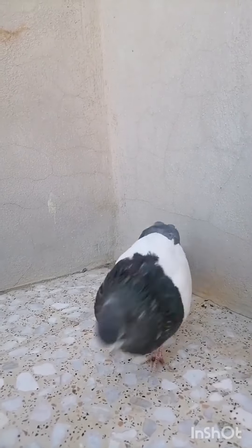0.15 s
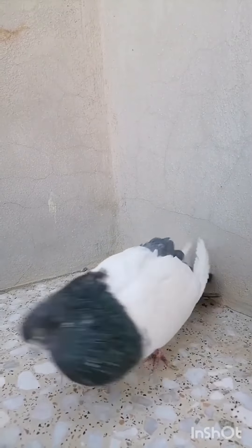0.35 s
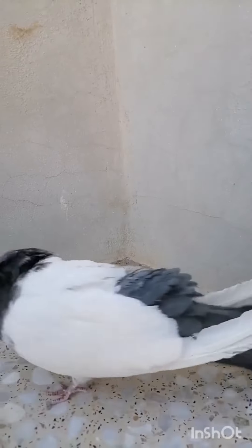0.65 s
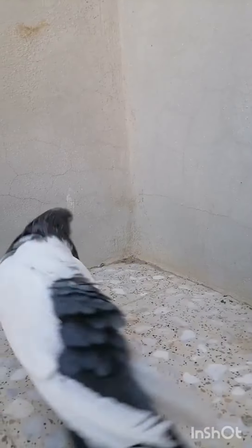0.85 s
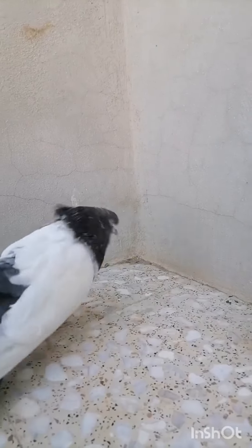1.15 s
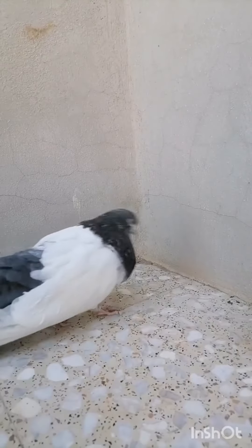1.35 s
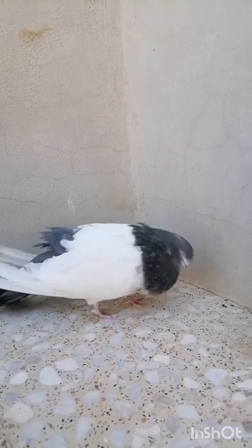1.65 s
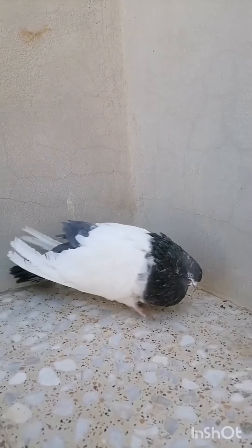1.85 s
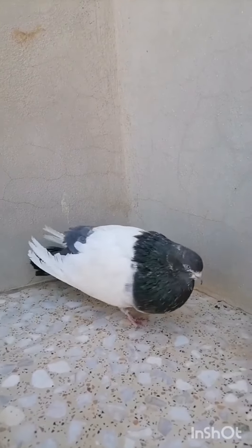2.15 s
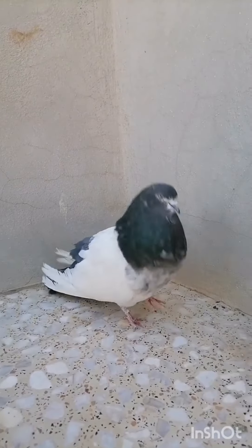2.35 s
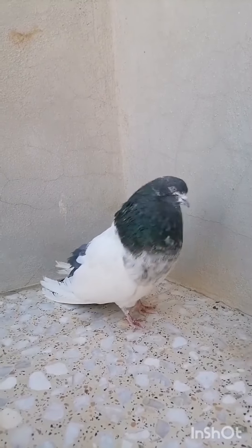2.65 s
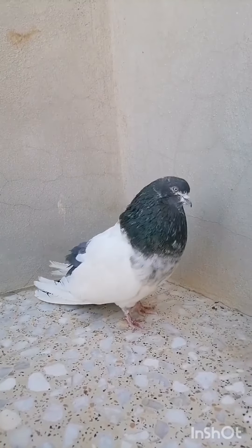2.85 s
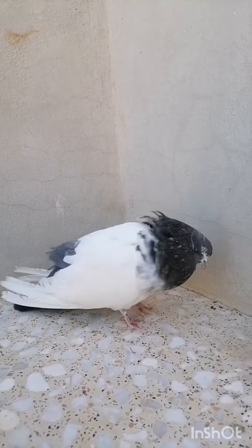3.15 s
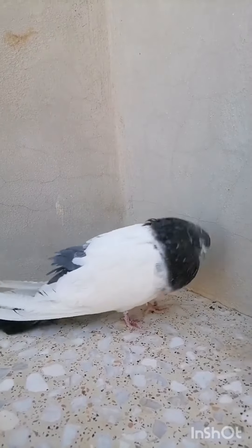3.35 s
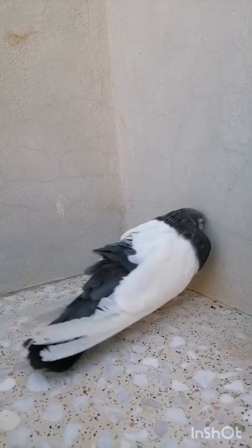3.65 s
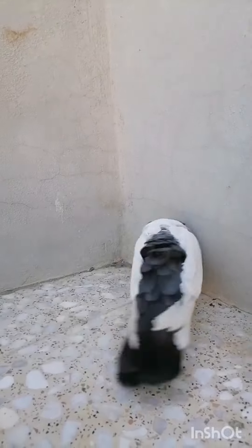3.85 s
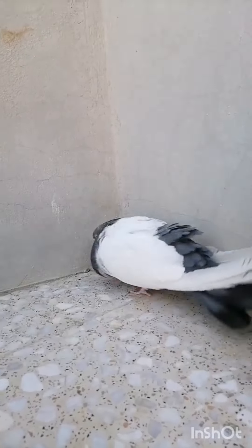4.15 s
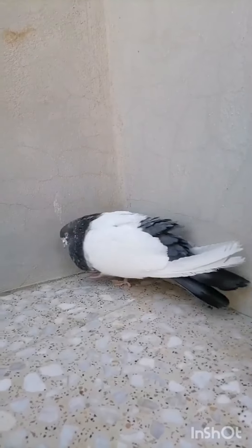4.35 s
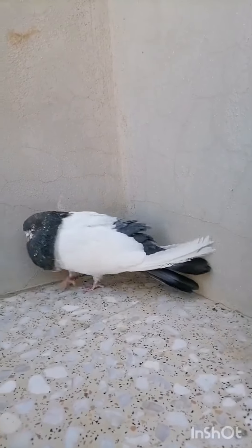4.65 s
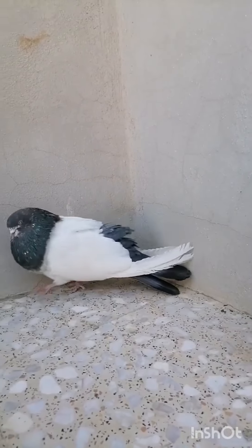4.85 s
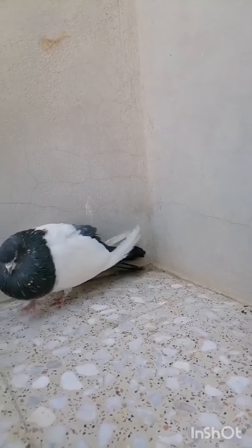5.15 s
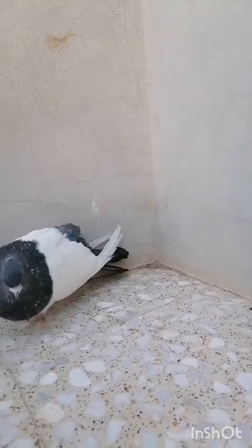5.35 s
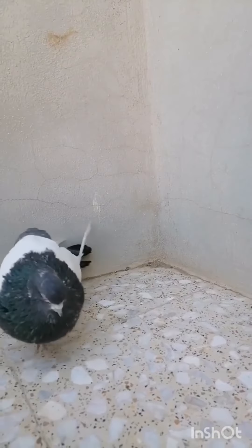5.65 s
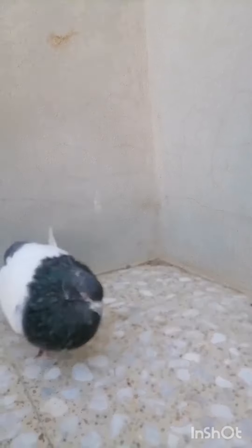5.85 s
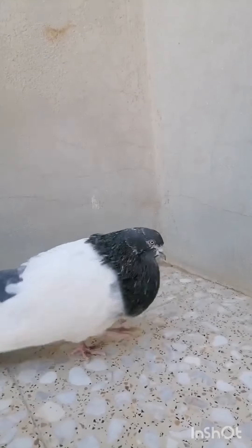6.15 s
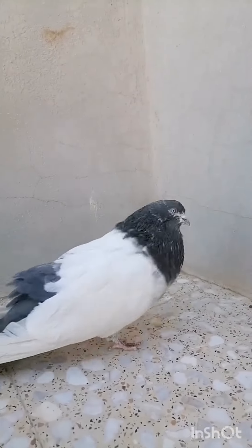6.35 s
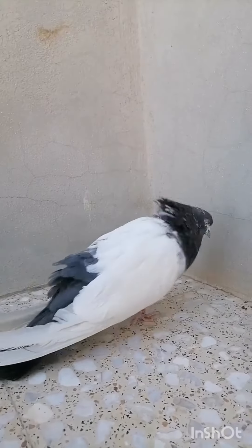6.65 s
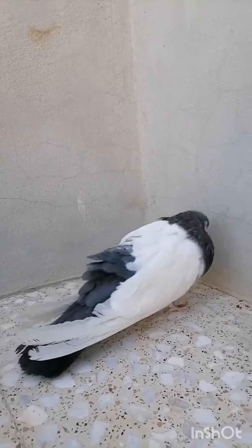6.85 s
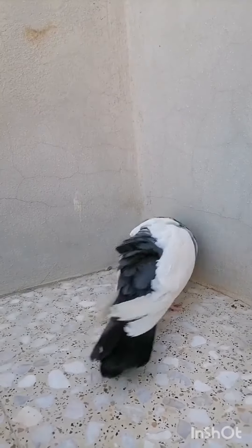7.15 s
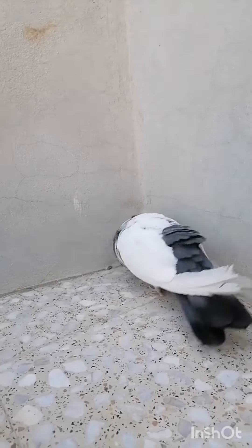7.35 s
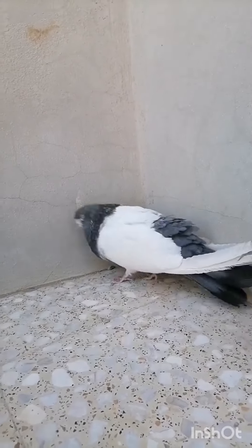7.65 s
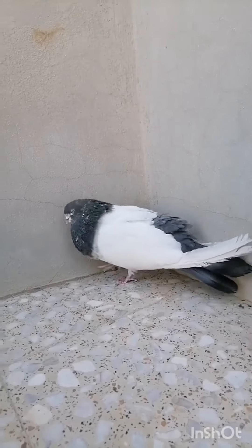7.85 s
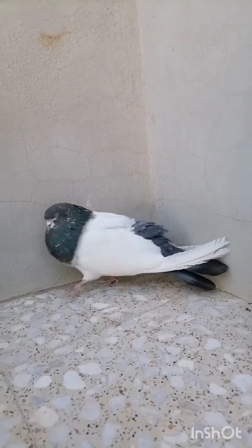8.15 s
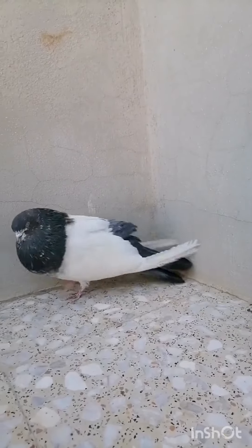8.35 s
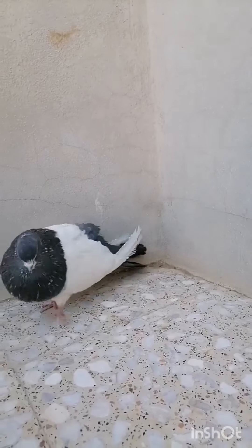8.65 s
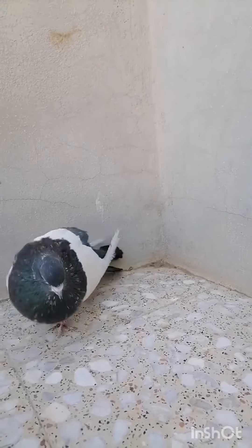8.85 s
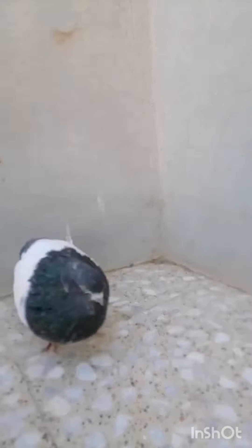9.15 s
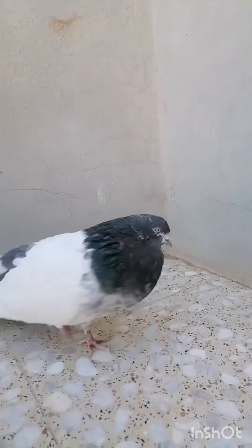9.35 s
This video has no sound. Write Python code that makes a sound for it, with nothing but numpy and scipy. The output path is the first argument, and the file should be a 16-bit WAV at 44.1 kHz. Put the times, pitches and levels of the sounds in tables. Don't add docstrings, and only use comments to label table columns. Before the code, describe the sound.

Low pigeon coos, clapping wingbeats and a perch landing, then quiet claw taps and distant birdsong before a closer, doubled gargling coo stops abruptly.

```python
import sys
import numpy as np
from scipy import signal
from scipy.fft import rfft, irfft
from scipy.io import wavfile
from scipy.ndimage import uniform_filter1d, minimum_filter1d

SR = 44100
rng = np.random.default_rng(int(sys.argv[2]) if len(sys.argv) > 2 else 0)


def level_to_linear(level):
    exponent = np.asarray(level, float) / 20
    return 10 ** exponent


def generate_wav(signal):
    frames = np.transpose(np.atleast_2d(signal))
    scaled = np.clip(frames, -1, 1) * 32767
    pcm = np.round(scaled).astype(np.int16)
    wavfile.write(sys.argv[1], SR, pcm)


N = 418950
FLIGHT_S, SPLICE_S, END_S = 1.54, 6.52, 8.467


def index(s):
    return int(np.clip(s * SR, 0, N - 1))


def butter(x, hz, kind, order=2):
    return signal.sosfilt(signal.butter(order, np.clip(hz, 10, .45 * SR), kind, fs=SR, output="sos"), x)


def both_ways(x, hz, kind):
    return signal.sosfiltfilt(signal.butter(3, hz, kind, fs=SR, output="sos"), x, padlen=600)


def rms_one(x):
    return x / np.sqrt(np.mean(x ** 2) + 1e-20)


def wobble(size, hz):
    z = rng.standard_normal((2, 30000))
    z = rms_one(butter(z, hz, "low", order=4)[:, 3000:3000 + size])
    return z[0] + 1j * z[1]


def span(rows, fade=0.0054):
    s, *columns = np.transpose(rows)
    t = np.arange(index(s[0]), index(s[-1])) / SR
    gate = np.clip(np.minimum(t - s[0] + (s[0] == 0), s[-1] - t) / fade, 0, 1)
    return slice(index(s[0]), index(s[-1])), gate, [np.interp(t, s, c) for c in columns]


def coloured(spectrum, patchy_db):
    hz = np.fft.rfftfreq(N, 1 / SR) + 1
    edges = 20 * 2 ** np.arange(0, 10.5, .5)
    at, db = np.transpose(spectrum)
    shaped = rfft(rng.standard_normal(N)) * level_to_linear(np.interp(np.log(hz), np.log(at), db))
    out = 0
    for low, high in zip(edges, edges[1:]):
        points = np.arange(N // 1500 + 2)
        flicker = np.interp(np.arange(N) / 1500, points, rng.standard_normal(len(points)))
        out = out + irfft(shaped * ((hz >= low) & (hz < high)), N) * level_to_linear(patchy_db * flicker)
    return out / np.std(butter(out, 1500, "high", order=4))


def bursts(events, width, gain_db, order=1):
    out, t = np.zeros(N + 9000), np.arange(9000) / SR
    for (s, db, hz, t60), noise in zip(events, rng.standard_normal((len(events), len(t)))):
        band = rms_one(butter(noise, [hz / width, hz * width], "band", order=order))
        rise = np.minimum(t / (0.025 * t60), 1)
        out[index(s):index(s) + len(t)] += level_to_linear(db + gain_db - 60 * t / t60) * rise * band
    return out[:N]


def crop_puffs(puffs):
    out, t = np.zeros(N), np.arange(4000) / SR
    turns = rng.uniform(0, 2 * np.pi, (len(puffs), 2))
    for (s, db, hz, upper_hz, upper_db, length), turn in zip(puffs, turns):
        u = t / (0.42 * length)
        tone = np.sin(2 * np.pi * hz * t + turn[0])
        tone += level_to_linear(upper_db) * np.sin(2 * np.pi * upper_hz * t + turn[1])
        start = index(s - .002)
        out[start:start + len(t)] += level_to_linear(db) * u ** 1.5 * np.exp(1.07 * (1 - u ** 2)) * tone
    return out


# time in seconds, pitch in Hz, effort in dB,
# throat stretch in dB (lifts the third harmonic).
COOS = [
    [(1.32, 92.2, -32, -7), (1.4, 133.7, -33, 5), (1.47, 172, -36, -14), (1.545, 197, -34, -27.5)],
    [(0, 180, -8, -20), (.07, 174.4, -4.5, -30), (.11, 177.2, -4, -26), (.14, 182.2, -5.5, -35),
     (.2, 187.6, -7.5, -40), (.225, 184, -10.5, -35.5), (.3, 172.7, -10.5, -32), (.35, 176.2, -17.5, -20.5),
     (.41, 170.3, -38, -19.5)],
    [(2.16, 129.3, -28, 0.5), (2.2, 126.2, -19, 4.5), (2.26, 121.6, -24.5, 7.5), (2.321, 129.2, -15, -5.5),
     (2.38, 134.5, -18, -1), (2.435, 125.3, -18.5, 0.5), (2.45, 129.2, -39, 11.5), (2.53, 137.4, -45, 8)],
]
CLOSE_COOS = [
    [(7.0, 147.1, -37, 12), (7.06, 172.9, -33.5, -12), (7.087, 208, -19.5, -10),
     (7.12, 196.6, -19.5, -10.5), (7.238, 184.5, -19, -6.5), (7.248, 183.7, -65, -3),
     (7.33, 189.2, -44.5, 10), (7.5, 188.2, -48, -3)],
    [(7.93, 147.7, -46, 11), (8.0, 179.2, -36, -1.5), (8.042, 209.6, -26, -21.5), (8.065, 195.3, -20, -1.5),
     (8.099, 177.8, -22.5, -3.5), (8.184, 177.8, -21.5, 0), (8.199, 175, -47, 6), (8.28, 170.3, -40.5, 4),
     (8.38, 168, -67, 3)],
]
# roughness [0-1], strong-weak alternation [0-1], flutter depth [0-1],
# flutter rate in Hz, fundamental in dB relative to the second harmonic.
COO_GRAIN = [
    (0.3, 0.2, 0.05, 29, 2),
    (0.17, 0.08, 0.15, 27, -15),
    (0.55, 0.22, 0, 39, -25),
    (0.25, 0.3, 0.22, 43, -14),
    (0.22, 0.27, 0.16, 50, -13),
]
# low edge in Hz, high edge in Hz.
CROP_BANDS = [(149, 1500), (155, 1500), (225, 1500), (162, 680), (160, 720)]
# time in seconds, depth [0-1].
CATCHES = [(0.026, 0.4), (0.062, 0.9), (.086, 0.94), (0.11, 1), (0.153, 0.47), (0.169, 0.4), (0.214, 0.4),
           (0.232, 0.3), (0.252, 0.54), (0.27, 0.8), (0.307, 1), (.321, 1), (.347, 0.9), (.369, 0.6)]


def coos():
    out = np.zeros(N)
    rattles_db = [-26.5, -12, -29, -19.5, -24]
    for rows, grain, rattle_db, (low_hz, high_hz) in zip(COOS + CLOSE_COOS, COO_GRAIN, rattles_db, CROP_BANDS):
        rough, weak, depth, flutter_hz, first_db = grain
        at, gate, (pitch, db, third_db) = span(rows)
        beat = np.cumsum(flutter_hz * (1 + 0.23 * wobble(len(gate), 15).real)) / SR
        flutter = depth * np.cos(2 * np.pi * beat)
        pitch = pitch * (1 + 0.21 * flutter)
        phase = 2 * np.pi * np.cumsum(pitch) / SR
        shape = gate * (1 + weak * np.cos(phase / 2)) * (1 + flutter)
        top_db = min(third_db.mean(), -12)
        levels = [first_db, 0, third_db, top_db - 8, top_db - 15, top_db - 22]
        for k, rel_db in enumerate(levels):
            waver = np.sqrt(1 - rough) + np.sqrt(rough / 2) * wobble(len(gate), 51.5)
            waver = waver / (np.abs(waver) + 0.13) ** 0.5
            tone = np.sqrt(2) * shape * level_to_linear(db + rel_db) * np.real(waver * np.exp(1j * (k + 1) * phase))
            if k < 2:
                tone = both_ways(tone, 2.78 * pitch.max(), "low")
            out[at] += tone
        rattle = np.real(wobble(len(gate), 50) * np.exp(1j * 1.4 * phase))
        out[at] += gate * level_to_linear(db + rattle_db) * rattle
        out[at] = both_ways(both_ways(out[at], low_hz, "high"), high_hz, "low")
    t = np.arange(SR // 2) / SR
    for s, depth in CATCHES:
        out[:len(t)] *= 1 - depth * np.exp(-((t - s) / 0.0057) ** 2)
    return out


# start in seconds, peak in dB, pitch in Hz, length in seconds.
THROBS = [(1.234, -36.5, 301, 0.038), (1.329, -21, 555, 0.0076), (1.553, -13, 325, 0.025),
          (1.566, -15, 387, 0.017), (1.572, -19, 270, 0.0085), (1.59, -25, 370, 0.012),
          (1.614, -16.5, 540, 0.012), (1.617, -34, 535, 0.036), (1.716, -11, 355, 0.028),
          (1.784, -9.5, 370, 0.028), (1.871, -3.5, 364, 0.014), (1.881, 0.5, 333, 0.014),
          (1.961, 2.5, 351, 0.036), (1.988, -8, 353, 0.018), (2.028, -27, 340, 0.061)]


def throbs():
    return crop_puffs([(s, db, hz, 500, -20, length) for s, db, hz, length in THROBS])


# start in seconds, peak in dB, lower and upper resonance in Hz.
GARGLE = [(6.572, -25, 392, 467), (6.587, -27, 334, 434), (6.617, -30, 390, 580), (6.716, -25.5, 302, 433),
          (6.755, -23, 285, 487), (6.802, -18.5, 297, 528), (6.871, -14, 328, 568), (6.988, -13, 320, 534),
          (7.231, -16.5, 374, 531), (7.295, -20, 393, 690), (7.305, -30, 645, 760), (7.529, -21, 420, 470),
          (7.543, -24, 332, 500), (7.576, -20, 380, 648), (7.604, -23.5, 403, 686), (7.674, -23, 413, 490),
          (7.709, -20, 263, 515), (7.751, -16, 306, 532), (7.811, -13.5, 311, 566), (7.897, -11, 317, 572),
          (8.184, -21, 347, 558)]


def gargle():
    puffs = []
    for s, db, hz, upper_hz in GARGLE:
        length = 0.013 * level_to_linear(0.59 * (db + 19.5))
        puffs.append((s, db, hz, upper_hz, 0.9, length))
    return crop_puffs(puffs)


# time in seconds, pitch in Hz, level in dB.
GLIDES = [
    [(1.66, 181, -45.5), (1.68, 183.3, -29), (1.79, 207.5, -37)],
    [(1.795, 304, -7.5), (1.86, 476, -25.5), (1.92, 570, -30.5), (1.96, 573, -27.5)],
    [(1.99, 487.4, -26), (2.05, 485.5, -29), (2.1, 418, -19), (2.14, 356, -12.5), (2.185, 245, -24)],
    [(6.89, 249, -44), (6.93, 276.7, -39.5), (6.96, 289, -35), (6.985, 305, -51)],
]
GLIDE_OCTAVES = [2, -33.5, -42, 6.5]


def glides():
    out = np.zeros(N)
    for rows, octave_db in zip(GLIDES, GLIDE_OCTAVES):
        at, gate, (pitch, db) = span(rows)
        phase = 2 * np.pi * np.cumsum(pitch) / SR
        uneven = 1 + 0.25 * wobble(len(gate), 39.8).real
        tone = level_to_linear(db) * np.sin(phase) + level_to_linear(db + octave_db) * np.sin(2 * phase)
        out[at] += np.sqrt(2) * gate * uneven * tone
    return out


# start in seconds, peak in dB.
CREAKS = [(6.638, -44), (7.108, -18), (7.365, -27), (7.436, -29), (7.447, -27), (7.458, -39),
          (7.584, -23.5), (7.595, -28.5), (8.264, -25), (8.275, -28), (8.288, -22), (8.297, -22),
          (8.305, -14), (8.317, -31), (8.328, -21), (8.347, -38), (8.386, -43), (8.4, -33), (8.418, -46),
          (8.443, -35.5)]


def creaks():
    out, t = np.zeros(N), np.arange(2000) / SR
    throat = [(370, 0.014, 0.5), (663, 0.017, 1.5), (930, 0.0088, -23)]   # Hz, t60 s, dB
    for (s, db), spread in zip(CREAKS, rng.standard_normal((len(CREAKS), 3))):
        for (hz, t60, rel_db), z in zip(throat, spread):
            ring = np.sin(2 * np.pi * hz * (1 + 0.048 * z) * t)
            out[index(s):index(s) + len(t)] += level_to_linear(db + rel_db + .5 * z - 60 * t / t60) * ring
    return butter(out, [260, 1150], "band")


# start in seconds, peak in
# dB, centre in Hz, t60 in seconds.
NOISE_BURSTS = [(.018, -24.5, 2300, 0.027), (.049, -23, 1872, 0.021), (.214, -34.5, 3200, 0.018),
                (.503, -34.5, 1880, .03), (1.55, -29, 2180, 0.046), (1.72, -27, 30, .4),
                (1.748, -17, 5200, .03), (1.556, -31, 11000, .02), (6.398, -35, 3180, .06),
                (1.873, -23, 7000, 0.026), (7.231, -29.5, 593, 0.023), (7.604, -31.5, 693, 0.023),
                (8.185, -27, 596, 0.025), (0, -30, 900, 0.085), (.98, -33, 200, 0.22),
                (3.563, -39.5, 2200, .12), (4.25, -44, 544, 0.28), (1.7, -30, 35, 0.68), (6.53, -45.5, 189, .3),
                (7.108, -33, 1120, 0.045), (7.26, -42, 690, 0.1), (7.292, -34, 800, 0.024),
                (7.39, -33, 1171, 0.049), (7.432, -27.5, 1330, 0.038), (8.058, -33.5, 935, 0.036),
                (8.24, -35.5, 665, 0.14), (2.833, -28, 2420, 0.11)]


def noise_bursts():
    return bursts(NOISE_BURSTS, width=1.5, gain_db=-2.0)


# time in seconds, hiss in dB, downwash in dB, downwash centre in Hz.
WINGS = [
    (1.54, -61, -52.5, 73.6),
    (1.58, -40.5, -44, 71),
    (1.64, -31.5, -43, 62.6),
    (1.72, -35, -34.5, 53.9),
    (2.582, -35, -36.5, 64.2),
    (2.8, -39.5, -41, 79.4),
    (3.1, -62, -59, 94.4),
]
# start in seconds, peak in dB.
STROKES = [(1.547, -26.5), (1.745, -11), (1.87, -13.5), (1.9194, -30), (1.998, -21.5), (2.049, -31.5),
           (2.12, -19.5), (2.1694, -26), (2.255, -17), (2.38, -15), (2.4297, -34), (2.5, -15),
           (2.5568, -32), (2.623, -25.5), (2.663, -21.5), (2.832, -21), (2.847, -21.5)]
# frequency in Hz, density in dB per Hz.
WING_AIR = [(71, -38.5), (120, -7.5), (404, -4.5), (1400, -13), (3400, -17), (6200, -14.5), (11000, -27.5),
            (14000, -33.5)]


def wings():
    at, gate, (hiss_db, wash_db, wash_hz) = span(WINGS)
    swell, clap, t = np.zeros(N), np.zeros(N), np.arange(9000) / SR
    swell[at] = gate * level_to_linear(hiss_db) ** 2
    for s, db in STROKES:
        shape = level_to_linear(db - 8.0 - 60 * t / 0.15) * np.minimum(t / 0.008, 1)
        swell[index(s):index(s) + len(t)] += shape ** 2
        clap_db = -18.5 - db + 0.44 * (db + 16.5)
        clap[index(s):index(s) + len(t)] += shape * level_to_linear(clap_db)
    out = np.sqrt(swell) * coloured(WING_AIR, patchy_db=1.8)
    out += clap * rms_one(butter(rng.standard_normal(N), [600, 1500], "band"))
    beat = 1 + 0.33 * np.cos(2 * np.pi * 12.0 * (np.arange(len(gate)) / SR - .21))
    lumps = .08 + .68 * wobble(len(gate) // 4 + 1, 110).repeat(4)[:len(gate)]
    wash = np.real(lumps * np.exp(2j * np.pi * np.cumsum(wash_hz) / SR))
    out[at] += gate * level_to_linear(wash_db) * beat * wash
    return out


# start in seconds, start and end pitch in Hz, peak in dB, t60 in seconds.
PERCH = [
    (2.838, 425, 442, -20.5, 0.16),
    (2.845, 242, 184, -30, .2),
    (2.91, 182, 185, -35.5, .35),
    (2.955, 387, 370, -35, 0.073),
    (3.005, 515, 560, -41, .2),
    (3.008, 398, 430, -41, .1),
]


def perch():
    out, t = np.zeros(N), np.arange(9000) / SR
    for s, start_hz, end_hz, db, t60 in PERCH:
        hz = end_hz + (start_hz - end_hz) * np.exp(-t / 0.0315)
        ring = np.minimum(t / 0.0029, 1) * np.sin(2 * np.pi * np.cumsum(hz) / SR)
        out[index(s):index(s) + len(t)] += level_to_linear(db - 60 * t / t60) * ring
    return out


# start in seconds, peak in dB, centre in Hz.
THUDS = [(0.499, -32.5, 365), (0.675, -36.5, 372), (0.979, -28.5, 396), (2.844, -26, 400),
         (2.914, -40, 250), (3.013, -39.5, 420), (3.306, -35.5, 533), (3.621, -35.5, 330),
         (3.878, -26.5, 794), (3.997, -33, 840), (4.028, -36, 398), (4.318, -30, 380), (4.619, -39, 640),
         (5.367, -33, 600), (5.496, -37.5, 423), (5.67, -41.5, 586), (5.799, -32, 540), (5.986, -38, 503),
         (6.117, -35.5, 1150), (6.158, -32, 382), (6.398, -29, 610)]


def claws():
    knocks = bursts([(*row, .15) for row in THUDS], width=1.71, gain_db=-4.0, order=2)
    pushes = [(s + .018, db, hz * 0.42, .2) for s, db, hz in THUDS]
    return knocks + bursts(pushes, width=1.26, gain_db=-11)


# start in seconds, peak in dB.
SCUFFS = [(0.018, -16.5), (0.0486, -24), (0.1467, -26), (0.2124, -37), (0.239, -26.5), (0.389, -31),
          (0.504, -32), (0.9135, -28), (0.9413, -24.5), (1.48, -31), (3.562, -29), (3.641, -35),
          (3.874, -33.5), (4.06, -39), (4.2176, -36.5), (4.342, -40), (4.4306, -36.5), (4.953, -39.5),
          (5.031, -32.5), (5.109, -34.5), (5.1894, -40), (5.278, -32.5), (5.533, -36.5), (5.626, -39),
          (5.702, -39.5), (5.774, -38.5), (5.953, -39.5), (6.125, -37.5), (6.217, -39)]


def scuffs():
    events = [(s, db, 6000, 0.18 if s > FLIGHT_S else 0.026) for s, db in SCUFFS]
    return bursts(events, width=1.34, gain_db=-9.0)


# start in seconds, peak in dB, centre in Hz.
TICKS = [(6.655, -37.5, 5300), (6.688, -25, 6100), (7.247, -31, 7640), (7.2564, -33.5, 7660),
         (7.3926, -33, 3000), (7.444, -29.5, 2897), (7.546, -32, 4010), (7.6082, -34, 6910),
         (7.642, -32, 3400), (7.685, -31, 10200), (7.8258, -31, 2830), (7.887, -34, 3320),
         (8.022, -25, 6800), (8.0574, -24, 5200), (8.257, -30.5, 4980), (8.292, -30, 4040),
         (8.385, -33, 3440), (8.403, -38, 2510)]


def ticks():
    return bursts([(*row, .011) for row in TICKS], width=1.74, gain_db=2.5)


def corner(x, t60):
    t = np.arange(11000) / SR
    tail = butter(rng.standard_normal(len(t)), 3010, "low") * level_to_linear(-60 * t / t60) * (t > .004)
    return signal.fftconvolve(x, tail / np.linalg.norm(tail))[:N]


# start in seconds, length in seconds, pitch in Hz, level in dB.
WHISTLES = [
    (0.275, 0.22, 3804, -56.5),
    (0.819, 0.16, 3835, -57),
]
# start in seconds, pitch in Hz, level in dB.
CHIPS = [
    (.565, 8800, -65),
    (.625, 7900, -58),
    (.725, 7740, -56),
    (.975, 7700, -72),
    (1.255, 8300, -56),
    (1.365, 6460, -62),
    (1.41, 7740, -63),
]
# start in seconds, length in seconds, start and end pitch in Hz, level in dB.
WARBLES = [
    (0, 0.08, 4340, 4150, -53),
    (.15, .08, 4250, 4230, -66),
    (.28, 0.08, 2330, 2230, -64),
    (.36, .13, 2230, 2220, -67),
    (0.59, 0.065, 4250, 4190, -53),
    (.62, .105, 2500, 2480, -67),
    (.755, .04, 6750, 6600, -65),
    (.8, .04, 6750, 6900, -61),
]
FAR_SONG = [(3.25, 0.094, 3240, 3280, -67), (3.31, 0.25, 3460, 3400, -63), (3.38, 0.099, 3730, 3670, -66),
            (3.77, 0.064, 2100, 2070, -63), (4.02, 0.064, 2480, 2410, -63), (4.08, 0.054, 3950, 3820, -70),
            (4.15, 0.15, 3140, 3020, -70), (4.2, 0.07, 2110, 2240, -62), (4.3, 0.11, 2090, 2480, -63),
            (4.42, 0.11, 2470, 2490, -65), (4.45, 0.095, 3090, 3250, -68), (4.351, 0.075, 3500, 3060, -67),
            (4.416, 0.075, 2970, 3550, -56.5), (4.37, .06, 3400, 3400, -65), (4.47, .06, 3440, 3500, -64),
            (4.58, .08, 3470, 3400, -66), (4.68, .06, 2050, 1850, -66), (4.52, 0.077, 2150, 1890, -63),
            (4.55, 0.092, 3800, 3950, -67), (4.6, 0.088, 1870, 1804, -63), (4.62, 0.14, 3300, 3000, -66),
            (4.87, 0.037, 4800, 5070, -59), (4.92, 0.057, 5220, 5230, -57),
            (5.59, 0.12, 5800, 4500, -61), (5.735, 0.057, 3020, 4320, -51.5), (5.8, 0.042, 5270, 4450, -58),
          (5.95, 0.065, 3700, 3720, -63), (5.99, 0.07, 4140, 4250, -58), (6.107, 0.093, 4380, 4210, -56.5),
          (6.145, 0.019, 4300, 5200, -50), (6.165, 0.035, 4480, 4780, -50), (6.19, .03, 3200, 3250, -61),
          (6.2, 0.064, 4700, 4750, -65), (6.03, 0.046, 4150, 4630, -64), (5.53, 0.051, 3720, 3700, -57),
          (5.66, 0.052, 3350, 3520, -63), (6.268, 0.03, 5370, 4660, -50), (6.32, 0.035, 3250, 3250, -55),
          (6.335, 0.027, 3830, 4400, -53), (6.351, 0.047, 6360, 7700, -56),
          (6.36, 0.051, 4370, 4550, -53.5), (6.362, .02, 3700, 4050, -54), (6.375, 0.035, 3520, 3400, -52),
          (6.415, .065, 3390, 3280, -55), (6.457, 0.056, 3700, 4200, -58), (6.48, 0.044, 7000, 7970, -57.5)]


def birds():
    out, t = np.zeros(N), np.arange(9000) / SR
    notes = [(s, length, hz, hz * (1 - .165), db) for s, length, hz, db in WHISTLES]
    notes += [(s, 0.042, hz, hz * (1 - 0.11), db) for s, hz, db in CHIPS]
    for s, length, start_hz, end_hz, db in notes + WARBLES + FAR_SONG:
        u = np.linspace(0, 1, int(length * SR))
        far = s > 3
        bend = .2 if length > .12 and not far else .9
        waver, steady, uneven = (.014, .3, .5) if far else (.002, 1.1, .12)
        hz = start_hz + (end_hz - start_hz) * u ** bend
        hz = hz * (1 + waver * wobble(len(u), 90).real)
        shape = np.sin(np.pi * u ** .7) ** 0.21 * np.abs(steady + uneven * wobble(len(u), 60))
        out[index(s):index(s) + len(u)] += level_to_linear(db + 9.0) * shape * np.sin(2 * np.pi * np.cumsum(hz) / SR)
    echoes = rng.standard_normal(len(t)) * level_to_linear(-60 * t / 0.35)
    return out + level_to_linear(-3.5) * signal.fftconvolve(out, echoes / np.linalg.norm(echoes))[:N]


# time in seconds, level in dB.
LEAVES = [(.5, -66), (.8, -47.5), (1.2, -48), (1.33, -48), (1.36, -70), (2.6, -59.5), (2.75, -52.5),
          (2.9, -59.5), (3.05, -52), (3.3, -63), (3.6, -85)]


def leaves():
    at, gate, (db,) = span(LEAVES)
    out = np.zeros(N)
    flicker = level_to_linear(2.5 * wobble(len(gate) // 8 + 1, 100).real.repeat(8)[:len(gate)])
    rustle = rms_one(butter(rng.standard_normal(len(gate)), [5100, 8800], "band"))
    out[at] = gate * level_to_linear(db) * flicker * rustle
    return out


# time in seconds, level in dB.
HUSH_1 = [(0, -44), (.1, -45.5), (.45, -53.5), (.7, -51), (1.05, -48), (1.2, -43), (1.33, -48),
          (1.37, -52.5), (1.54, -49), (2.9, -53.5), (3.2, -53), (4.2, -52), (4.8, -53), (5.9, -53.5),
          (6.52, -51.5)]
HUSH_2 = [(6.52, -57.5), (6.9, -51), (7.2, -46), (7.7, -48), (7.95, -45), (8.15, -48), (8.3, -42.5),
          (8.467, -45.5)]
# frequency in Hz, density in dB per Hz.
AIR_1 = [(15, -36), (25, -1.5), (60, -3), (269, -3.5), (563, -6), (1500, -10.5), (4520, -12),
         (13700, -24.5)]
AIR_2 = [(15, -28), (25, -33), (178, 2), (523, -4.5), (1110, -11), (1900, -16), (11500, -18.5),
         (15500, -22.5)]


def hush(rows, spectrum, rumble_db=0, stays=0):
    at, gate, (db,) = span(rows, fade=0.0065)
    noise, out = coloured(spectrum, patchy_db=.7)[at], np.zeros(N)
    rumble = level_to_linear(rumble_db - stays * (db - db.mean())) - 1
    out[at] = gate * level_to_linear(db) * (noise + rumble * butter(noise, 910, "low"))
    return out


def hum():
    noise = rms_one(butter(rng.standard_normal(N), [33.6, 62.6], "band"))
    return level_to_linear(-54.5) * noise * (np.arange(N) > SPLICE_S * SR)


def scene():
    voices = coos() + throbs() + gargle() + glides() + creaks() + noise_bursts()
    near = voices + perch() + claws() + scuffs() + ticks()
    far = wings() + birds() * (np.arange(N) < SPLICE_S * SR) + leaves()
    far += hush(HUSH_1, AIR_1, rumble_db=2, stays=0.35) + hush(HUSH_2, AIR_2) + hum()
    return (near + level_to_linear(-17.0) * corner(near, t60=0.12) + far)[None]


def roll_off(x):
    return signal.sosfilt(signal.butter(12, 15980, fs=SR, output="sos"), x)


def record(dry):
    t = np.arange(N) / SR
    first, second = [signal.sosfilt(signal.cheby2(26, 60, top_hz + 120, fs=SR, output="sos"), dry)
                     for top_hz in (13900, 15700)]
    second = second * (t >= SPLICE_S) * np.clip((END_S - t) / 0.0037, 0, 1)
    x = first * (t < SPLICE_S) + second + np.roll(second, 4238, axis=1)
    x = x * level_to_linear(np.interp(t, [8.441, 8.47], [0, -4]))
    room = minimum_filter1d(np.minimum(1, .77 / (np.abs(x) + 1e-9)), size=301)
    return roll_off(x * uniform_filter1d(room, size=301))


dry = scene()
out = record(dry)
generate_wav(out)
```